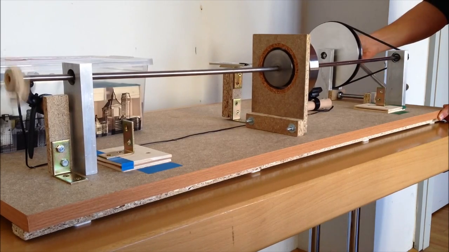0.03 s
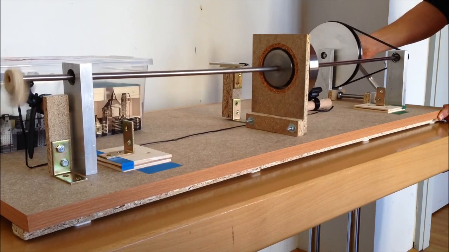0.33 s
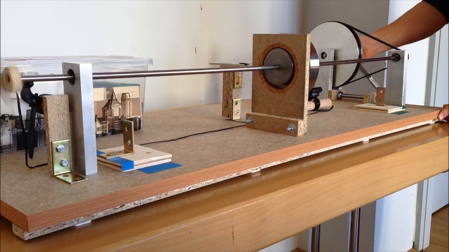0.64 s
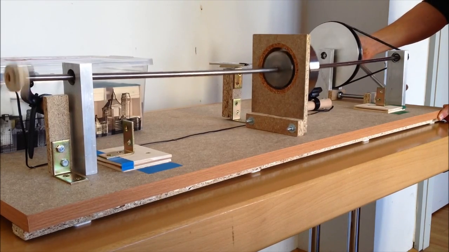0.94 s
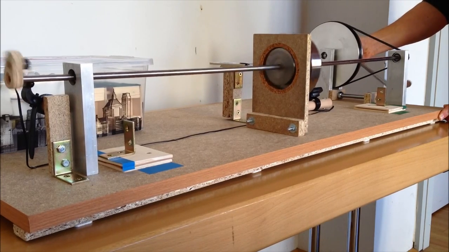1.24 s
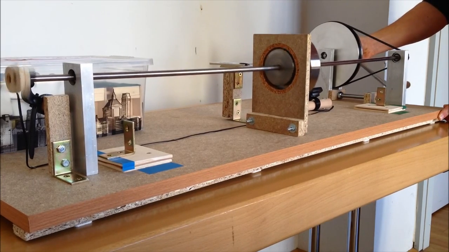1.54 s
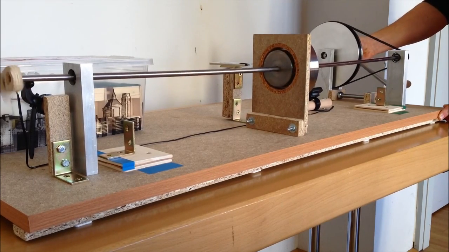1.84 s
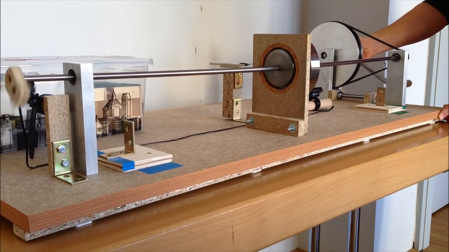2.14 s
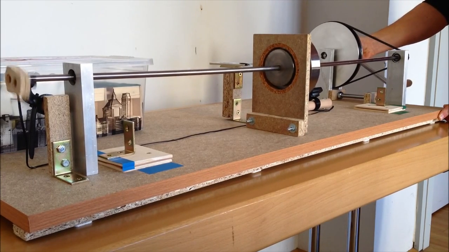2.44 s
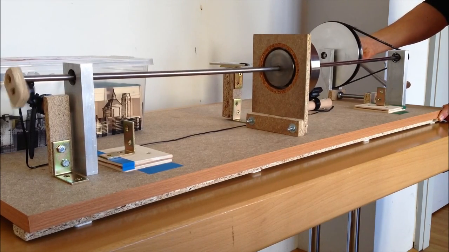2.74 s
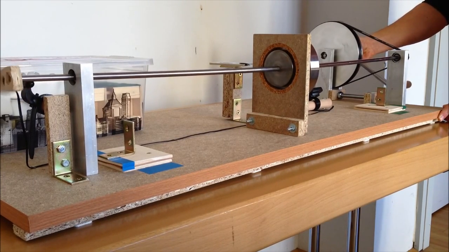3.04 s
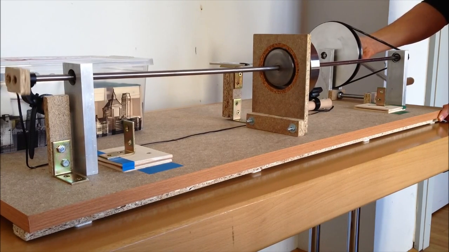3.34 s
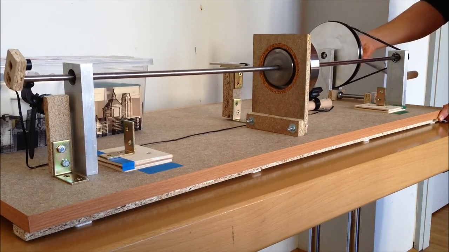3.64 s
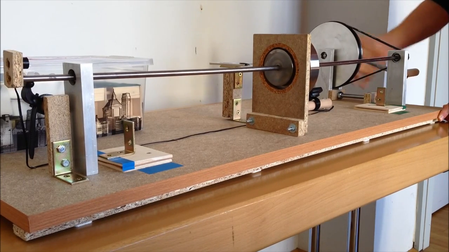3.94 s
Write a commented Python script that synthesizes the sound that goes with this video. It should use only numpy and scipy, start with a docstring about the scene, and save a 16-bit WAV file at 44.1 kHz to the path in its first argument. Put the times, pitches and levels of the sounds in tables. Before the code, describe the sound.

Rapid metallic ratchet clicking over a whirring shaft slows down and comes to a stop.

```python
"""A belt-driven steel shaft on a wooden rig spins unevenly, close by in a small room.
At first, at full speed, its wheel flicks a pawl in a fast rattle and the metal squeaks loudest;
bearings whir, the board rumbles and knocks once. From 1.2 to 1.4 s it knocks several times more.
The shaft slows and the rattle thins to single ratchet clicks, each chattering and ringing the metal.
The last click falls at 3.3 s; whir and rumble die away as the shaft stops."""
import sys
import numpy as np
from scipy import signal
from scipy.fft import rfft, irfft, next_fast_len
from scipy.io import wavfile
from scipy.ndimage import uniform_filter1d

SR = 44100
rng = np.random.default_rng(int(sys.argv[2]) if len(sys.argv) > 2 else 0)


def waveform_to_disk(signal):
    """Save audio, clipped to [-1, 1], as 16-bit WAV at the path in sys.argv[1]."""
    frames = np.transpose(np.atleast_2d(signal))
    scaled = np.clip(frames, -1, 1) * 32767
    samples = np.round(scaled).astype(np.int16)
    wavfile.write(sys.argv[1], SR, samples)


N = 176400

# Running shaft. Each row: time in seconds, bearing whir in relative dB, board rumble in relative dB.
RUNNING_LEVELS = [(0, -41, -48), (.1, -39.5, -42), (.25, -38.5, -50), (.5, -40, -47), (.8, -42, -46),
                  (1.05, -44, -48.5), (1.24, -41.5, -44), (1.4, -58, -41), (1.55, -46.5, -47.5),
                  (1.8, -51.5, -48), (2.2, -52, -49.5), (2.5, -58.5, -52), (2.85, -59, -54),
                  (3.15, -60.5, -60), (3.4, -72, -62), (3.6, -77, -71.5), (4, -88, -69.5)]


def undb(db):
    return 10 ** (np.asarray(db) / 20)


def unit(x):
    """Scale to an energy of 1."""
    return x / np.sqrt(np.sum(x ** 2) + 1e-18)


def noise(size):
    return rng.standard_normal(size)


def curve(rows, column=1):
    """One table column, linearly interpolated in time."""
    rows = np.array(rows)
    return np.interp(np.arange(N) / SR, rows[:, 0], rows[:, column])


def across(hz, points):
    """Interpolate (Hz, value) points on a log-frequency axis."""
    points = np.array(points, float)
    return np.interp(np.log(hz + 1), np.log(points[:, 0]), points[:, 1])


def colour(x, points, peaks=()):
    """Minimum-phase filter of given spectrum and resonances; keeps the power of white noise."""
    size = 2 * next_fast_len(len(x))
    hz = np.arange(size // 2 + 1) * SR / size
    peaks_db = sum(db / (1 + (2 * (hz - centre) / width) ** 2) for centre, width, db in peaks)
    gain = undb(across(hz, points) + peaks_db)
    cepstrum = irfft(np.log(gain / np.sqrt(np.mean(gain ** 2))))
    cepstrum[1:size // 2] *= 2
    cepstrum[size // 2 + 1:] = 0
    return irfft(rfft(x, size) * np.exp(rfft(cepstrum)))[:len(x)]


def wander(rate_hz):
    """Smooth random signal, standard deviation 1."""
    step = max(int(SR / rate_hz), 1)
    smooth = uniform_filter1d(np.repeat(noise(N // step + 1), step), step)[:N]
    return smooth / smooth.std()


def add(out, start_s, x):
    """Mix x into out."""
    i = max(int(start_s * SR), 0)
    out[i:i + len(x)] += x[:max(N - i, 0)]


def ring(x, modes, gain_db):
    """A part rings on in its modes after every blow."""
    t = np.arange(SR // 2) / SR
    response = np.zeros(len(t))
    for hz, db, t60_s in modes:
        tone = np.sin(2 * np.pi * (hz * t + rng.random()))
        response += undb(db) * unit(tone * np.exp(-np.log(1000) * t / t60_s))
    return undb(gain_db) * signal.fftconvolve(x, response)[:N]


def background():
    """Quiet hiss and hum of the room."""
    # Each row: frequency in Hz, relative level in dB.
    hiss_spectrum = [(18, -76), (30, -72.5), (148, -7), (263, -9.5), (292, -11), (455, -10), (747, -14),
                     (808, -13), (1170, -17), (15500, -14)]
    # Each row: frequency in Hz, RMS level in dB.
    hum_tones = [(296, -84), (528, -87.5), (797, -84)]
    t = np.arange(N) / SR
    hum = sum(undb(db) * np.sqrt(2) * np.sin(2 * np.pi * hz * t) for hz, db in hum_tones)
    return colour(noise(N), hiss_spectrum) * undb(-64) + hum


def room_reverb(x):
    """Dense reflections that die soonest in the bass and the top treble."""
    # Each row: frequency in Hz, relative level in dB.
    tail_spectrum = [(100, 0.5), (500, -3), (1000, 5), (2000, 1), (3200, 0), (4150, 0.5), (4750, -4),
                     (5900, -3.5), (7300, 5.5), (8400, 2), (9800, 1), (16000, -0.5)]
    # Each row: frequency in Hz, T60 in seconds.
    decay_times = [(100, 0.24), (1000, 0.6), (4000, 0.59), (6000, 0.67), (7200, 0.41), (9000, 0.45),
                   (11000, 0.3), (16000, 0.34)]
    build_s, gain_db = 0.014, -6.5
    hz, t, bins = signal.stft(noise(SR), SR)
    decay = np.exp(-np.log(1000) * t / across(hz, decay_times)[:, None])
    tail = signal.istft(bins * decay, SR)[1]
    tail *= 1 - np.exp(-np.arange(len(tail)) / SR / build_s)
    return undb(gain_db) * signal.fftconvolve(x, unit(colour(tail, tail_spectrum)))[:N]


def board_rumble():
    """The wooden board rumbles under the running shaft, its level swaying."""
    # Each row: frequency in Hz, relative level in dB.
    spectrum = [(25, -21), (60, -24.5), (90, -14.5), (125, -8.5), (200, -4), (280, -5), (370, -7.5),
                (500, -18), (900, -35)]
    # Each row: centre in Hz, width in Hz, gain in dB.
    resonances = [(162.7, 9.2, 15), (240.6, 57, 6.5), (271.3, 18, 10), (373, 36, 4)]
    sway_db = 1.5 * wander(rate_hz=13)
    level_db = curve(RUNNING_LEVELS, column=2) - 1 + sway_db
    return colour(noise(N), spectrum, resonances) * undb(level_db)


def loose_ticks():
    """Loose parts tick at random; their level follows the whir."""
    # Each row: frequency in Hz, relative level in dB.
    spectrum = [(80, -32), (300, -2), (1000, -7.5), (2200, 11), (3200, -2), (6000, -2), (8500, -2),
                (15000, -25.5)]
    ticks_per_s, spread_db, decay_s, gain_db = 70, 9.5, 0.00098, -7.5
    t = np.arange(SR // 100) / SR
    onsets = rng.random(N) < ticks_per_s / SR
    taps = onsets * undb(spread_db * np.clip(noise(N), -2, 2))
    bursts = signal.fftconvolve(taps, np.exp(-t / decay_s))[:N] * noise(N)
    return colour(bursts / bursts.std(), spectrum) * undb(curve(RUNNING_LEVELS) + gain_db)


def bearing_whir():
    """Bearings whir: fluttering noise through the rig's resonances."""
    # Each row: frequency in Hz, relative level in dB.
    spectrum = [(150, -25), (400, 6), (650, -1), (1000, -0.5), (1550, -1), (1950, 2), (2500, 7), (3100, -6),
                (4100, -10), (5000, -8), (8000, -15.5), (16000, -27.5)]
    # Each row: centre in Hz, width in Hz, gain in dB (negative for a notch).
    resonances = [(751, 83, 7), (956, 22, 10), (1263, 120, 11), (1831, 36, 13), (1925, 19, 16),
                  (2200, 56, -14.5), (4100, 200, 17.5)]
    flutter_db = 2 * wander(rate_hz=110)
    whir = colour(noise(N) * undb(flutter_db), spectrum, resonances)
    return whir * undb(curve(RUNNING_LEVELS) + 0.5)


def wheel_rub():
    """The wheel rubs dry, in fine grains."""
    # Each row: time in seconds, level in dB.
    levels = [(0, -29.5), (.14, -40), (.25, -33.5), (.42, -42), (.56, -45.5), (.65, -40), (.73, -57),
              (.84, -52), (1.0, -53), (1.22, -52), (1.3, -64), (1.55, -65), (1.78, -70), (2.4, -56),
              (3.0, -59), (3.3, -72)]
    # Each row: frequency in Hz, relative level in dB.
    spectrum = [(1000, -21), (2000, 2), (3000, 3), (4200, 8.5), (5000, 4.5), (6500, -3.5), (8500, -6.5),
                (10000, -1.5), (12500, -5.5), (16000, -1)]
    grain_db = wander(rate_hz=600)
    return colour(noise(N) * undb(grain_db), spectrum) * undb(curve(levels))


def board_knocks():
    """The board jolts with dull thuds and a little rattle, and rings on."""
    # Each row: start in seconds, level in dB, thud pitch in Hz.
    knocks = [(.125, -39.5, 261), (1.203, -41, 300), (1.218, -44, 204), (1.257, -46, 253),
              (1.323, -37.5, 335), (1.349, -32.5, 249), (1.358, -42, 373), (1.386, -33.5, 340)]
    # Each row: frequency in Hz, relative level in dB.
    rattle_spectrum = [(40, -17), (120, -10), (550, 10), (800, 0.5), (1300, 2), (2000, 6), (2800, -15),
                       (6000, -26)]
    # Each row: frequency in Hz, relative level in dB, T60 in seconds.
    wood_modes = [(161.2, 1.5, 0.85), (328.7, -7.5, 0.16), (850, -9, 0.34), (985, -10, 0.36)]
    rise_s, rattle_db = 0.0052, -3.5
    out, t = np.zeros(N), np.arange(SR // 10) / SR
    envelope = t / rise_s * np.exp(1 - t / rise_s)
    for start_s, db, hz in knocks:
        thud = np.sin(2 * np.pi * hz * t)
        rattle = undb(rattle_db) * colour(noise(len(t)), rattle_spectrum)
        add(out, start_s, undb(db) * envelope * (thud + rattle))
    return out + ring(out, wood_modes, gain_db=-18)


def metal_squeaks():
    """Rubbing metal sings in short, rough swells on one wavering mode."""
    # Each row: centre in seconds, half length in seconds, level in dB.
    swells = [(0.167, 0.019, -29), (0.184, 0.005, -22.5), (0.204, 0.007, -19), (0.218, .007, -24),
              (0.233, 0.0047, -21.5), (0.245, 0.0069, -24), (0.332, 0.012, -33), (0.391, 0.0077, -34),
              (0.441, 0.0074, -29), (0.57, 0.0076, -37), (0.683, 0.0073, -41), (0.713, 0.0052, -34),
              (1.02, 0.0062, -37), (1.253, .008, -37), (1.423, .008, -43)]
    t = np.arange(N) / SR
    envelope = sum(undb(db) * np.exp(-((t - centre_s) / half_s) ** 2) for centre_s, half_s, db in swells)
    roughness_db = 3 * wander(rate_hz=500)
    pitch_hz = 4126 * (1 + 0.01638 * wander(rate_hz=149.6))
    return envelope * undb(roughness_db) * np.sin(2 * np.pi * np.cumsum(pitch_hz) / SR)


def metal_ring(clicks):
    """Shaft and brackets ring after each click."""
    # Each row: frequency in Hz, relative level in dB, T60 in seconds.
    metal_modes = [(965, -6, .3), (1802, -7, .3), (1945, -6, .3), (2062, -11, .3), (3945, -6, .37),
                   (4135, 0, .25), (5438, -10, .28), (5713, -10, .35), (5870, -8, .4), (6180, -9, .35),
                   (6286, -8, .35), (6720, -7, .35), (7160, -7, .35), (7402, -7, .25)]
    return ring(clicks, metal_modes, gain_db=-36.5)


def pawl_hit(t, snap_hz, gains):
    """One contact: a tonal metal snap plus fresh noise for grit, bright crack and low clack."""
    # Each row of all three: frequency in Hz, relative level in dB.
    grit_spectrum = [(1500, -13.5), (3500, -3.5), (4700, -8.5), (5400, 17.5), (6500, -14.5), (7400, 14.5),
                     (8400, 2), (11000, -11.5), (16000, -20)]
    crack_spectrum = [(5000, -38), (8400, -1), (9400, 4.5), (11700, -3), (13500, -6.5), (16000, -14.5)]
    clack_spectrum = [(300, -31), (800, -12.5), (1500, -7), (2000, 1.5), (2500, 0), (3100, -6), (4050, 4.5),
                      (4600, -3), (6000, -14.5)]
    snap_s, grit_s, crack_s, clack_s = 0.00016, 0.00044, 0.0014, 0.0048  # time constants
    glide_per_s = 430  # a quick downward glide broadens the snap's tone
    pitch_hz = snap_hz * (1 - glide_per_s * (t - 2 * snap_s))
    snap = t ** 2 * np.exp(-t / snap_s) * np.sin(2 * np.pi * np.cumsum(pitch_hz) / SR)
    parts = [unit(snap)]
    for decay_s, spectrum in (grit_s, grit_spectrum), (crack_s, crack_spectrum), (clack_s, clack_spectrum):
        burst = noise(len(t)) * np.exp(-t / decay_s)
        parts.append(unit(colour(burst, spectrum)))
    return unit(gains @ np.array(parts))


def smear(hit, contacts):
    """Spread a hit over many small contacts."""
    return unit(signal.fftconvolve(hit, contacts)[:len(hit)])


def pawl_clicks():
    """Flicked by the wheel, the pawl hits, chatters, lifts and lands once more."""
    # Each row: start in seconds, relative level in dB, snap pitch in Hz, crack and clack offsets in dB.
    clicks = [(0.0209, -22, 7700, -17, -18), (0.0412, -17, 7360, -24, -5.5), (0.0627, -18, 7000, -25, -27),
              (0.0843, -17.5, 7770, -29, -19), (0.104, -28.5, 6410, 1, 0), (0.1231, -24.5, 7200, -4, -2),
              (0.143, -22, 7300, -13, -2), (0.1604, -19, 7100, -3, -4), (0.1791, -18, 6000, -11, -12),
              (0.1957, -17, 6370, -17, -3), (0.214, -20, 6300, -4, 0), (0.2294, -17.5, 7150, -6, -5),
              (0.246, -16, 6850, -5, -21), (0.2643, -17.5, 7200, -22, -11.5),
              (0.2818, -19.5, 6660, -11, -7), (0.302, -18.5, 6760, -2, -15), (0.318, -20, 6500, -2, -9),
              (0.3376, -18, 7260, -2, -14), (0.3576, -27, 7360, 8.5, 2), (0.38, -21.5, 7800, 2.5, 0),
              (0.406, -24, 7100, 3, 0), (0.4332, -25, 6360, 5.5, 4), (0.4624, -21, 7650, 4.5, -2.5),
              (0.4904, -22.5, 6200, 3.5, -7), (0.5122, -23.5, 6760, 5, -3.5), (0.532, -19.5, 6350, -1, -1),
              (0.5491, -20, 6200, -4, -8), (0.5702, -25, 6100, -1, 0), (0.6785, -36, 6170, 5, 7),
              (0.709, -28.5, 5400, -7, -7), (0.7382, -28.5, 5800, -8, -6), (0.7709, -26, 6400, -2.5, -6),
              (0.8013, -23, 5500, -27, -20), (0.8306, -22.5, 7700, -9, -4), (0.8573, -22.5, 7000, -6, -2),
              (0.879, -16.5, 6760, -22, -27), (0.9014, -15.5, 5740, -20, -11),
              (0.9227, -20.5, 5640, -10, -10), (0.945, -20.5, 5800, -13, -4),
              (0.9655, -17.5, 6150, -9, -11), (0.99, -16, 6400, -7, -7.5),
              (1.0149, -19.5, 6600, -3.5, -2.5), (1.0416, -17.5, 5500, -8, -8),
              (1.068, -18, 6950, -8.5, -5), (1.093, -18.5, 6340, -13, -5.5), (1.1171, -19, 6440, -17, -6.5),
              (1.14, -20, 6440, -22, -7), (1.1633, -19.5, 5950, -17, -9), (1.1865, -16.5, 6380, -13, -4),
              (1.213, -20, 6400, -20, -3), (1.2445, -23.5, 6340, -17, 2.5), (1.2908, -26, 6340, -2, 2.5),
              (1.3328, -20.5, 5920, -6, -2), (1.3715, -20.5, 5460, -4, -6), (1.4038, -19, 5660, -5, -3),
              (1.4353, -19.5, 6050, -3, -3.5), (1.4701, -22.5, 6000, -1, 1), (1.5092, -25, 5800, 2, 0),
              (1.5421, -25, 5700, -3, -5.5), (1.5717, -27, 6500, -2, -3), (1.5965, -31.5, 6100, -6, 2.5),
              (1.627, -32, 5750, -18, 7), (1.66, -34, 6400, -15, 3.5), (1.6988, -29, 5600, -12, -2),
              (1.7361, -39, 5830, 2, 3.5), (1.7775, -31, 7300, -15, -18), (1.815, -30, 5570, -18, 2.5),
              (1.8566, -29.5, 7100, -10, -2), (1.8974, -25.5, 5400, -12, -5.5),
              (1.9377, -23.5, 6230, -18, -5), (1.981, -24.5, 5940, -9, -7), (2.0353, -22, 6500, -8.5, -7.5),
              (2.092, -24.5, 5950, -1.5, -3), (2.1396, -20.5, 6100, -9, -4), (2.1799, -21, 6900, -14, -4),
              (2.2173, -17, 5640, -28, -8), (2.2605, -16, 5650, -16, -12.5), (2.31, -17, 5530, -31, -13),
              (2.3663, -29, 6340, -3.5, -1.5), (2.427, -17.5, 6000, -2, -5.5), (2.4835, -17, 5700, -6, -8),
              (2.5363, -18, 5270, -13, -8), (2.59, -19.5, 5700, -11, -4.5), (2.6479, -24.5, 5250, -7, -6),
              (2.7039, -26, 5940, -14, -2.5), (2.7681, -23, 6900, -18, -2.5), (2.841, -21, 6400, -28, -6.5),
              (2.924, -24, 6900, -7.5, -3), (3.0272, -24, 6500, -5.5, -1), (3.121, -24.5, 6130, -3, -0.5),
              (3.2927, -18, 6230, -6, -5)]
    chatter_db, bounce_db, lift_s, bounce_decay_s = -4.5, -5.5, 0.0095, 0.0037
    out, t = np.zeros(N), np.arange(SR // 30) / SR
    scrape = np.sin(np.pi * np.minimum(t / lift_s, 1))  # contact fades as the pawl lifts
    landing = np.exp(-t / bounce_decay_s)
    for start_s, db, snap_hz, crack_db, clack_db in clicks:
        gains = undb([-4, -9, crack_db - 4.5, clack_db - 3])  # snap, grit, crack, clack
        strength = undb(db) * np.linalg.norm(gains) * np.sqrt(SR / 1000)
        hit = pawl_hit(t, snap_hz, gains)
        chatter = smear(pawl_hit(t, snap_hz, gains), scrape * noise(len(t)))
        bounce = smear(pawl_hit(t, snap_hz, gains), landing * noise(len(t)))
        bounce_at_s = start_s + lift_s * np.exp(0.06 * rng.standard_normal())
        add(out, start_s, strength * (hit + undb(chatter_db) * chatter))
        add(out, bounce_at_s, strength * undb(bounce_db) * bounce)
    low_cut = signal.butter(3, 650, "high", fs=SR, output="sos")  # a small part gives no bass
    return signal.sosfilt(low_cut, out)


def scene():
    """Mono mix; only blows and squeaks feed the reverb."""
    clicks, squeaks = pawl_clicks(), metal_squeaks()
    blows = clicks + loose_ticks() + board_knocks()
    running = board_rumble() + bearing_whir() + wheel_rub()
    reverb = room_reverb(blows + undb(-5) * squeaks)
    return (background() + reverb + running + squeaks + metal_ring(clicks) + blows)[None]


def record(dry):
    """Steep low-pass on the top treble."""
    cutoff_hz = 15250
    return signal.sosfilt(signal.ellip(10, .2, 70, cutoff_hz, fs=SR, output="sos"), dry)


dry = scene()
out = record(dry)
waveform_to_disk(out)
```